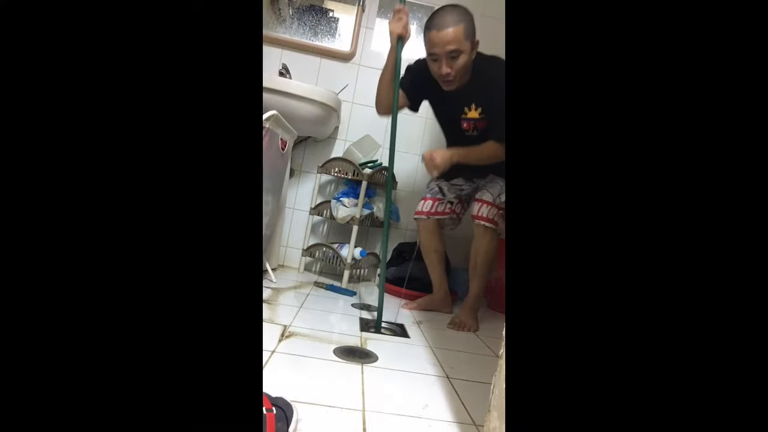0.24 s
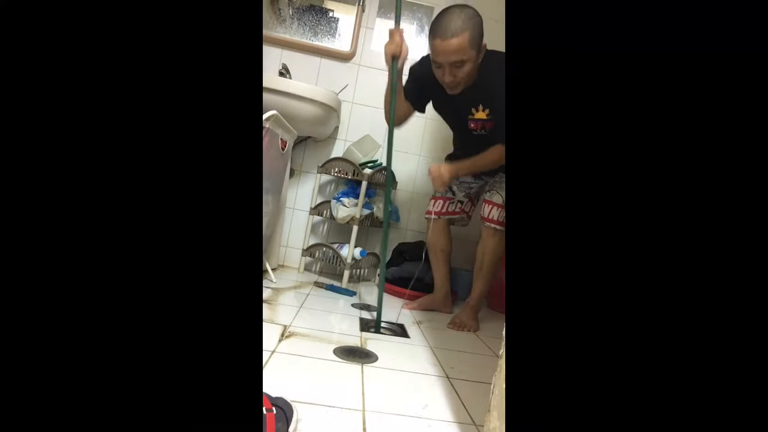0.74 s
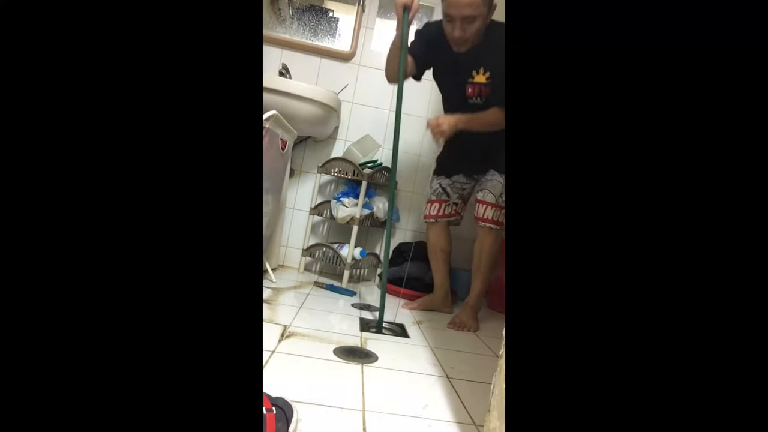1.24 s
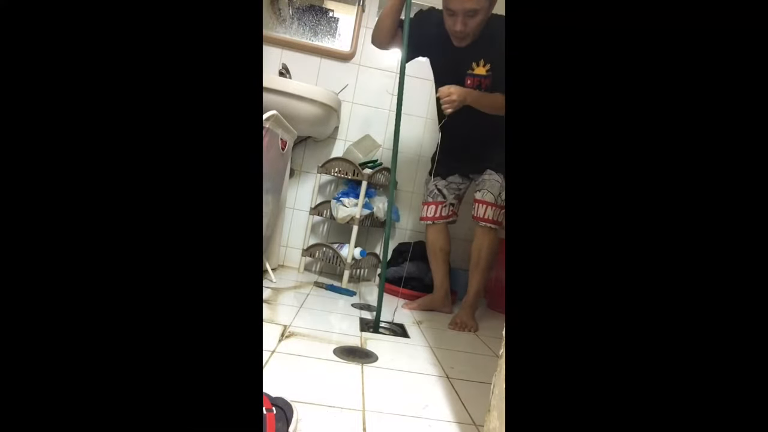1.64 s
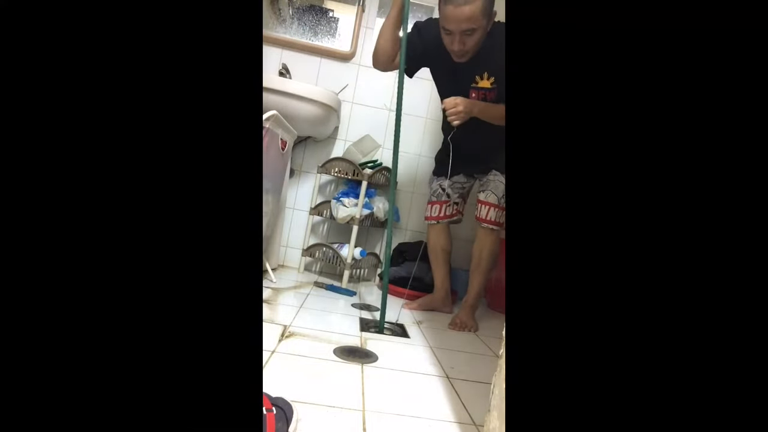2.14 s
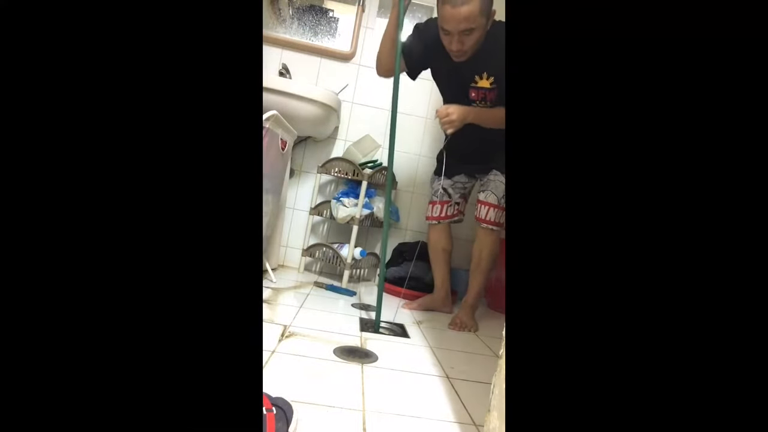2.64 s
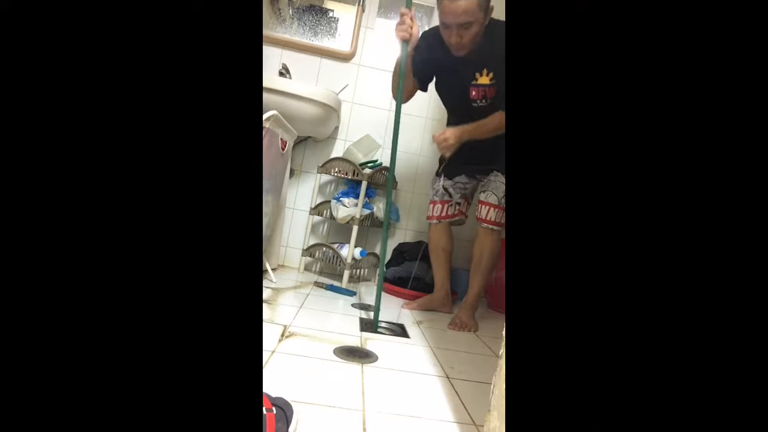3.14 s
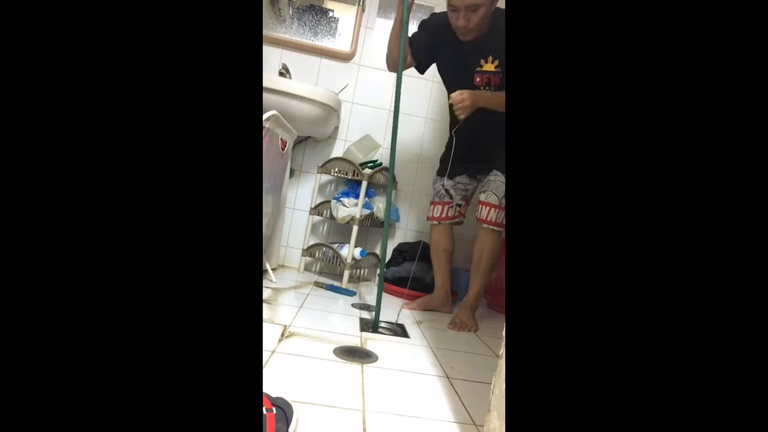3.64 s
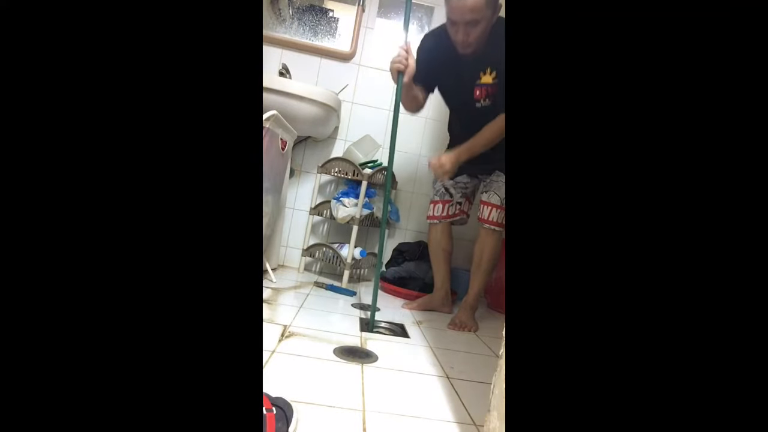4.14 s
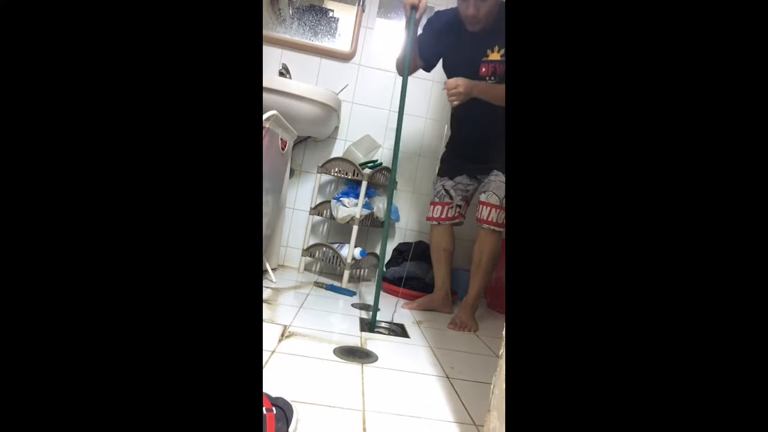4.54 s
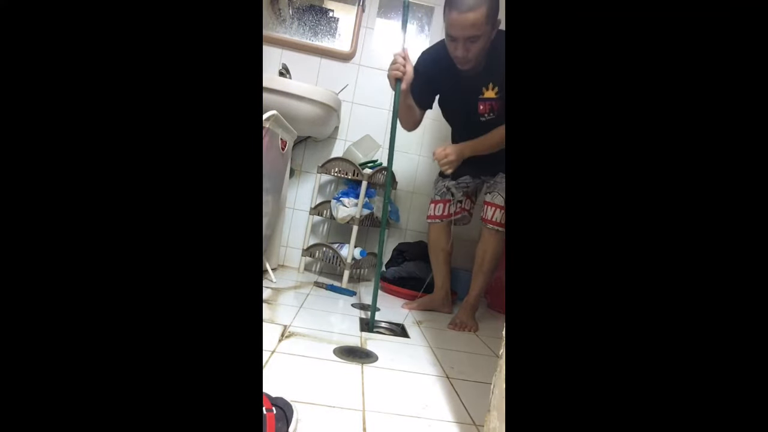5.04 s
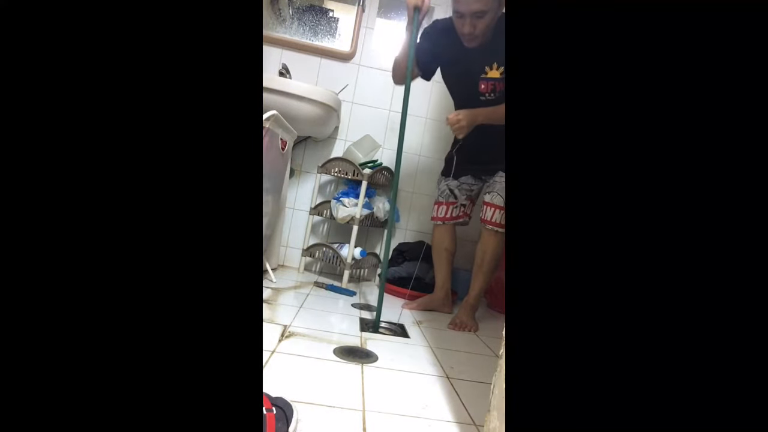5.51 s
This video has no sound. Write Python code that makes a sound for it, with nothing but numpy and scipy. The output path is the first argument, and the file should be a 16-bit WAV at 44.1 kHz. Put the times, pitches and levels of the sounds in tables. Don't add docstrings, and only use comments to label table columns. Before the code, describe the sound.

A long plastic tube is pumped in a clogged floor drain. Rough, rasping surges of water come with hollow knocks, low booms, glugs and spray. Two bursts of strokes are split by a near-silent gap with one lone wet knock, then strokes continue, the hardest rattling around four seconds. Small, hard tiled bathroom with short bright echoes; small microphone nearby, faint hiss and hum.

```python
import sys
import numpy as np
from scipy import signal
from scipy.fft import rfft, irfft
from scipy.io import wavfile
from scipy.ndimage import uniform_filter1d

SR = 44100
rng = np.random.default_rng(int(sys.argv[2]) if len(sys.argv) > 2 else 0)


def ratio_of_db(decibels):
    return 10 ** (np.asarray(decibels, float) / 20)


def wrap_up_sound(samples):
    columns = np.atleast_2d(samples).T
    tamed = np.clip(columns, -1, 1)
    steps = np.round(tamed * 32767).astype(np.int16)
    wavfile.write(sys.argv[1], SR, steps)


N = 254631

# frequency in Hz, width in Hz, level in dB.
SURGE_MODES = [(694, 152, -1), (813, 28, 0), (974, 38, 3), (1176, 32, 4), (1340, 143, 7.5), (1520, 39, -5)]
# frequency in Hz, width in Hz, level in dB.
RASP_MODES = [(1467, 54, -0.5), (1824, 91, -6.5), (1972, 130, -16.5), (2143, 170, -10.5)]
# frequency in Hz, width in Hz, level in dB.
SCRAPE_MODES = [(2246, 153, 4.5), (2783, 96, 7), (3270, 330, -4), (3820, 170, -6)]
# frequency in Hz, density in dB per Hz.
SPRAY = [(2120, -37), (3600, -4.5), (4050, -4), (4450, -5), (4830, -9.5), (6230, -6.5), (8100, -15.5),
         (9770, -17.5), (10600, -21.5), (13900, -21.5), (16000, -31)]
# start in seconds, rise in seconds, hold in seconds, level in dB, brightness in dB.
GUSHES = [(0.11, 0.31, .005, -37, 5.5), (0.222, 0.0069, 0.0041, -23.5, -19.5),
          (0.267, 0.063, 0.086, -30.5, -10), (0.551, 0.14, 0.13, -35, 2.5), (1.034, 0.061, 0.02, -36, 3.5),
          (1.129, 0.05, 0.16, -27.5, -1), (1.242, 0.031, 0.011, -25.5, 2),
          (2.373, 0.099, 0.0052, -46.5, -6), (2.525, 0.04, .02, -50, -3),
          (2.598, 0.0045, 0.045, -34.5, -29), (2.611, 0.048, 0.0037, -30, 3.5),
          (2.782, 0.16, .09, -37.5, -0.5), (2.976, 0.028, 0.11, -24.5, -11), (3.073, 0.04, 0.12, -37.5, 0),
          (3.38, 0.085, .005, -38.5, 4.5), (3.78, 0.038, 0.073, -30.5, 1.5),
          (3.883, 0.13, 0.057, -25.5, 12), (4.339, 0.005, 0.091, -34, -0.5),
          (4.398, 0.023, 0.037, -25, -2.5), (4.458, 0.041, 0.035, -29.5, 2.5),
          (4.797, 0.005, 0.033, -30, -11), (4.803, 0.095, 0.055, -24, 4), (5.225, 0.11, 0.047, -39.5, -2),
          (5.352, 0.089, 0.16, -55.5, 2)]
# start in seconds, rise in seconds, hold in seconds, scrape in dB, spray in dB.
SPLASHES = [(0.578, 0.092, 0.044, -48, -45), (2.64, 0.023, 0.014, -48, -44.5),
            (2.803, 0.0064, 0.02, -61, -56.5), (2.968, 0.026, 0.055, -30, -39),
            (3.304, 0.02, 0.018, -49.5, -57), (3.655, 0.02, 0.033, -58.5, -60),
            (4.272, 0.025, 0.016, -45, -53), (4.706, 0.034, 0.022, -53, -57),
            (4.892, 0.069, 0.031, -31.5, -37), (5.227, .04, 0.031, -52, -55.5),
            (5.306, .004, 0.013, -47, -61)]


def surge():
    drive = slips(per_s=260, spread_db=5.0, hiss=0.49)

    walls = lumpy(drive, SURGE_MODES, lump_db=1.5) + 0.024 * drive
    body = rms_one(band(walls, 503, 1115)) + ratio_of_db(-4) * bubbles()
    body = band(band(body, 360, 4500), 360, 5000)

    rasp = band(lumpy(drive, RASP_MODES, lump_db=1.5), 1724, 2254)
    rasp = rms_one(band(rasp, 710, 4000))

    other_grains = np.roll(drive, SR)
    scrape = band(lumpy(other_grains, SCRAPE_MODES, lump_db=4.0), 2290, 6900)
    scrape = rms_one(band(scrape, 1600, 7500))

    splutter = uniform_filter1d(np.abs(drive), size=260) ** 0.85
    spray = coloured(0.07 * drive + 1.8 * splutter * rng.standard_normal(N), SPRAY)

    levels_db = []
    for *_, db, bright_db in GUSHES:
        upper_db = db - 4.5
        levels_db.append([db - 6.5,
                          upper_db - 4 + 0.93 * bright_db,
                          upper_db - 6 + 0.69 * bright_db,
                          upper_db - 10 + 0.47 * bright_db])
    for *_, scrape_db, spray_db in SPLASHES:
        levels_db.append([-120, -120, scrape_db, spray_db])
    gains = summed([gush(*row[:3]) for row in GUSHES + SPLASHES], levels_db)
    layers = body, rasp, scrape, spray
    return sum(gain * ratio_of_db(2.0 * drift(27)) * layer for gain, layer in zip(gains, layers))


def gush(s, rise_s, hold_s):
    swell_db, drain_db_per_s = 19, 237
    trickle_db, trickle_fall_db_per_s = -25.5, 22.5
    rise = swell_db / max(rise_s, .002)
    opened = swell(s, 10, 2 * rise, 0)
    main = swell(s + rise_s, hold_s, rise, drain_db_per_s)
    trickle = swell(s + rise_s, hold_s, rise, trickle_fall_db_per_s)
    return opened * (main + ratio_of_db(2 * trickle_db) * trickle)


def slips(per_s, spread_db, hiss):
    sizes = ratio_of_db(spread_db * np.minimum(rng.exponential(1, N), 2.6)) * rng.choice([-1, 1], N)
    born = rng.random(N) < per_s * ratio_of_db(5 * drift(40)) / SR
    return rms_one(sizes * born) + hiss * rng.standard_normal(N)


def lumpy(x, modes, lump_db):
    return sum((-1) ** k * ratio_of_db(lump_db * drift(27)) * resonate(x, [mode]) for k, mode in enumerate(modes))


def bubbles():
    pitches = np.geomspace(880, 2900, 24)
    born = slips(per_s=320, spread_db=5.0, hiss=0)
    dealt = rng.integers(0, 24, N)
    out = 0
    for k, hz in enumerate(pitches):
        mode = (hz, 1.96 * hz / 25.5, -4.0 * np.log2(hz / 1000))
        out = out + resonate(born * (dealt == k), [mode])
    return rms_one(out)


# frequency in Hz, phase waver in radians, flutter in dB.
COLUMN_MODES = [(63.2, 0.42, -0.5), (120.4, 0.63, 1.5), (231.4, 1, 2.5), (293.4, 1, 3)]
# frequency in Hz, width in Hz, level in dB.
GURGLE_MODES = [(271.5, 8.8, -2.5), (382.5, 30, 2.5), (400, 46, -0.5), (469, 92, -4.5)]
# peak in seconds, deepest mode in dB, second mode in dB.
HEAVES = [(.22, -49, -40.5), (.4, -45, -46), (.54, -53, -48), (.8, -44, -35), (1.25, -34.5, -49),
          (1.32, -44, -37), (1.44, -33.5, -35.5), (1.75, -53, -50), (2.2, -50, -67), (2.46, -59, -41),
          (2.55, -64, -37), (2.84, -45, -45), (3.07, -37, -40), (3.33, -45, -50), (3.5, -67, -57),
          (3.61, -49, -63), (3.89, -39, -49), (4.05, -39.5, -41.5), (4.45, -50, -42), (4.51, -28.5, -56),
          (4.58, -46, -50), (4.84, -49, -44), (4.98, -31, -47), (5.03, -52, -35), (5.17, -39, -53),
          (5.38, -47.5, -51)]
# peak in seconds, third mode in dB, fourth mode in dB, gurgle in dB.
PUSHES = [(.234, -36, -36.5, -60), (.32, -42, -31.5, -41), (0.382, -34.5, -31, -32.5),
          (0.45, -41, -37, -38.5), (0.658, -38, -30.5, -61), (.722, -37, -52, -33), (.794, -44, -35, -55),
          (1.11, -40, -36, -56), (1.17, -40, -25, -47), (1.205, -25, -24, -23), (1.256, -24, -20.5, -28),
          (1.29, -36, -27.5, -26.5), (1.328, -27.5, -36, -21.5), (1.61, -46.5, -53, -40.5),
          (2.51, -41.5, -41, -40), (2.57, -41, -61, -60), (2.64, -57, -38, -32), (2.73, -45, -43, -43),
          (3.01, -28, -25.5, -28), (3.08, -28, -45, -28.5), (3.169, -32, -26.5, -33.5),
          (3.487, -39, -52, -34), (3.6, -47, -72, -79), (3.821, -44, -34, -39), (3.93, -40, -29, -30.5),
          (4.041, -21, -17, -28), (4.1, -35, -24.5, -40), (4.36, -40, -55, -35), (4.438, -27, -23, -33),
          (4.472, -43, -40, -35), (4.54, -33.5, -38, -32.5), (4.82, -39, -45, -33.5),
          (4.91, -35, -19.5, -33), (4.99, -25.5, -40, -27)]


def column():
    t = np.arange(N) / SR
    rings = []
    for hz, waver, flutter_db in COLUMN_MODES:
        tone = np.sin(2 * np.pi * hz * t + waver * drift(9.5))
        rings.append(rms_one(tone * ratio_of_db(flutter_db * drift(21.7))))
    rough = slips(per_s=100, spread_db=2.0, hiss=0.27)
    gurgle = rms_one(band(resonate(rough, GURGLE_MODES), 195, 411))

    heaves = [swell(row[0], 0.0042, 164, 100) for row in HEAVES]
    pushes = [swell(row[0], 0.0032, 240, 146) for row in PUSHES]
    deep_gains = summed(heaves, np.array(HEAVES)[:, 1:], [-53.5, -65])
    upper_gains = summed(pushes, np.array(PUSHES)[:, 1:], [-62.5, -68.5, -74])
    return sum(gain * ring for gain, ring in zip(deep_gains + upper_gains, rings + [gurgle]))


# time in seconds, crack in dB, crack frequency in Hz, thud in dB.
KNOCKS = [(0.031, -22, 2460, -52), (0.2355, 0, 1420, -25), (0.2283, -7, 1570, -42), (0.24, -7, 1125, -36),
          (0.279, -13, 1340, -40), (0.653, -19, 2200, -50), (0.841, -1.5, 1350, -26),
          (0.695, -15, 2050, -29), (0.767, -0.5, 1860, -17), (0.771, -20, 2740, -29),
          (1.047, -22, 1680, -57), (1.096, -12, 1440, -23.5), (1.163, -6, 1380, -37),
          (1.202, -1, 1360, -38), (1.243, 0.5, 1020, -28), (1.273, -2.5, 970, -30), (1.31, -14, 1880, -30),
          (1.334, -11, 1030, -31), (1.375, -4.5, 1010, -22), (1.7478, -6.5, 990, -19),
          (2.342, -30, 1810, -41.5), (2.46, -31, 1390, -47), (2.551, -20, 1180, -41),
          (2.604, -17, 1100, -24), (2.672, -6.5, 1970, -27), (2.668, -1, 954, -42), (2.812, -21, 2180, -35),
          (2.913, -21, 950, -38), (2.979, -2, 2270, -26), (2.983, -7, 1100, -22), (2.998, -6, 1010, -22),
          (3.024, 4, 915, -32), (3.031, -10, 1300, -23), (3.008, -7.5, 1900, -26), (3.062, -8, 1070, -35),
          (3.084, -13, 1520, -26), (3.102, -3, 1570, -23)]
# time in seconds, crack in dB, crack frequency in Hz, thud in dB.
LATE_KNOCKS = [(3.48, -13.5, 2340, -22), (3.792, -20, 1050, -30), (3.826, -12, 1030, -23.5),
               (3.958, 1.5, 2100, -17.5), (4.347, -11, 750, -42), (4.355, -7, 1230, -27),
               (4.426, -1, 950, -13.5), (4.444, -5, 1410, -32), (4.803, -17, 720, -37),
               (4.805, -12, 1050, -18), (4.858, -10, 1910, -26), (4.9244, 0.5, 2150, -13),
               (4.93, -7, 1030, -23), (4.955, -8, 1110, -21), (4.975, 2.5, 1500, -20.5),
               (5.317, -2.5, 1420, -11.5)]
# time in seconds, crack in dB.
RATTLE = [
    (4.002, 1.5),
    (4.012, -8),
    (4.025, 3.5),
    (4.047, 6),
    (4.058, -2),
    (4.064, -7),
    (4.072, -3),
    (4.098, -12),
]
# frequency in Hz, width in Hz, level in dB.
UPPER_MODES = [(233, 25, 3), (307, 26.5, 5), (370.5, 27, 2.5), (460, 65, -11), (694, 99, -7.5)]


def knocks():
    t = np.arange(1024) / SR
    rattle = [(s, db, 1690, db - 23) for s, db in RATTLE]
    hits = KNOCKS + LATE_KNOCKS + rattle
    chatter = rng.standard_normal((len(hits), len(t))) * np.exp(-t / 0.001)
    chatter[:, 0] = 6
    chatter /= np.linalg.norm(chatter, axis=1)[:, None]
    out, thud = np.zeros((2, N + len(t)))
    for (s, db, hz, thud_db), touch in zip(hits, chatter):
        crack = resonate(touch, [(hz, 0.11 * hz, 7)]) + 0.5 * band(touch, 0.37 * hz, 3.7 * hz)
        crack = band(band(crack, 420, 2.2 * hz), 220, 1.83 * hz)
        at = round(s * SR)
        out[at:at + len(t)] += ratio_of_db(db + 11.0) * crack
        thud[at] = ratio_of_db(thud_db + 23.0)
    boom = band(thud + 4.24 * resonate(thud, UPPER_MODES), 115, 820)
    return (out + boom)[:N]


# time in seconds, level in dB, centre in Hz, width in Hz, decay in milliseconds.
SPURTS = [(0.0308, -27, 5200, 3500, 12), (0.028, -47, 10600, 9200, 19), (.97, -56, 9000, 11000, 25),
          (1.7478, -26, 4390, 720, 7.7), (1.7478, -32.5, 5000, 6800, 16), (1.748, -25, 1040, 1800, 14.7),
          (5.3165, -34.5, 830, 750, 16), (0.2275, -15.5, 1600, 810, 2.2), (2.7, -49, 3700, 950, 4.5),
          (2.5502, -38, 3300, 850, 4.5), (2.8118, -37, 5200, 4700, 5.6), (2.8123, -50, 12900, 5100, 8.5),
          (2.918, -47, 8600, 11000, 6.0), (3.7, -45, 5000, 2500, 4.0), (5.436, -35, 2750, 500, 6.0),
          (4.303, -39, 2800, 360, 15), (4.303, -54, 6200, 900, 11), (3.951, -35.5, 6100, 2500, 14),
          (4.176, -50.5, 12200, 6900, 30), (4.215, -57, 8000, 670, 21), (5.287, -49, 2450, 2300, 27),
          (5.316, -14, 2780, 3000, 3.5), (5.3147, -42.5, 9300, 8000, 4.7), (5.3158, -22.5, 5800, 3600, 2.3),
          (2.9785, -27, 3500, 3100, 5.8), (2.995, -30.5, 4140, 920, 46), (1.7476, -50, 12000, 5500, 10),
          (0.2362, -13, 1700, 2500, 0.88), (0.767, -24, 2970, 580, 4.4), (1.2025, -21, 1300, 700, 5),
          (3.958, -16.5, 1900, 1500, 6.2), (5.512, -52, 6900, 580, 6.4)]


def spurts():
    out, t = np.zeros(N), np.arange(SR // 5) / SR
    hisses = rng.standard_normal((len(SPURTS), len(t)))
    for (s, db, hz, width_hz, ms), hiss in zip(SPURTS, hisses):
        edges = hz - width_hz / 2, hz + width_hz / 2
        jet = rms_one(band(band(hiss, *edges), *edges)) * np.exp(-t * 1000 / ms)
        out[round(s * SR):][:len(t)] += ratio_of_db(db) * jet
    return out


# time in seconds, level in dB, frequency in Hz.
TICKS = [(0.0316, -23, 2360), (0.2307, -28, 2730), (0.2362, -21, 2900), (0.241, -14, 2320),
         (0.6443, -38, 2810), (0.7142, -27, 2840), (1.0674, -45, 2860), (1.0838, -34, 2710),
         (1.1806, -24, 2650), (1.2819, -27, 2940), (1.7472, -24, 4250), (1.7484, -20, 1240),
         (1.749, -22.5, 2860), (1.7493, -22, 5300), (1.761, -24, 1200), (1.786, -31, 3350),
         (2.4592, -38.5, 3540), (2.459, -50, 2500), (2.55, -36, 3800), (2.5515, -41, 1990),
         (2.6043, -35, 1900), (2.627, -32, 2580), (2.642, -25, 2500), (2.6498, -23, 2500),
         (2.659, -21.5, 4530), (2.6699, -18, 2480), (2.726, -27, 2400), (2.8107, -27, 4050),
         (2.812, -35, 5400), (2.816, -29, 6300), (2.979, -15.5, 2780), (2.996, -26, 4300),
         (3.0324, -16, 2920), (3.035, -24, 4400), (3.05, -27, 4200), (3.084, -17, 3000),
         (3.2265, -26, 2570), (3.4775, -25.5, 2740), (3.7937, -33, 4370), (3.8101, -28, 3810),
         (3.8635, -22, 2810), (3.9593, -14, 2000), (3.9626, -15, 3700), (4.0025, -7.5, 1900),
         (4.0255, -11.5, 1850), (4.0485, -12, 2100), (4.312, -33, 2790), (4.3475, -32, 1500),
         (4.3649, -29, 3470), (4.4661, -24.5, 2590), (4.7829, -34, 4040), (4.8064, -29, 2590),
         (4.8587, -26, 3640), (4.87, -13, 3270), (4.906, -12, 2900), (4.953, -13, 2810), (4.976, -24, 2830),
         (5.2898, -38, 3220), (5.3174, -9, 2750), (5.3187, -15, 1430)]
# time in seconds, level in dB, frequency in Hz.
GLUGS = [(0.235, -15.5, 1070), (0.278, -26, 1310), (0.326, -19, 785), (0.679, -26, 942), (0.731, -22, 980),
         (0.77, -18.5, 694), (1.163, -23, 1310), (1.201, -13, 1170), (1.241, -13, 980), (1.274, -17, 964),
         (1.334, -18, 1020), (1.376, -20, 988), (1.743, -31, 1100), (1.747, -17.5, 1200), (2.604, -23, 993),
         (2.646, -23, 931), (2.67, -22, 1020), (2.979, -19, 1030), (2.997, -21, 1030), (3.023, -10, 939),
         (3.069, -18, 915), (3.107, -20, 1000), (3.794, -31, 603), (3.816, -28, 1050), (3.826, -18, 1020),
         (4.001, -19, 810), (4.023, -13, 1260), (4.347, -26, 660), (4.425, -20.5, 969), (4.469, -21, 1000),
         (4.537, -24, 974), (4.795, -26, 665), (4.804, -28, 1050), (4.856, -25, 1070), (4.923, -14, 935),
         (5.317, -12, 1310)]


def drops():
    return fading_cycles(TICKS, cycles=11) + ratio_of_db(-6) * fading_cycles(GLUGS, cycles=14)


def fading_cycles(rows, cycles):
    out, t = np.zeros(N), np.arange(1024) / SR
    for s, db, hz in rows:
        onset = 1 - np.exp(-1.5 * hz * t)
        decay = ratio_of_db(-26.0 * hz * t / cycles)
        out[round(s * SR):][:len(t)] += ratio_of_db(db) * np.sin(2 * np.pi * hz * t) * onset * decay
    return out


# peak in seconds, hold in seconds, level in dB.
SLOSHES = [
    (.33, 0.069, -40),
    (0.768, .03, -41),
    (1.188, 0.11, -38.5),
    (2.66, .03, -63),
    (3.024, 0.13, -44),
    (3.994, 0.07, -46.5),
    (4.439, .05, -38),
    (4.928, 0.094, -34),
    (5.327, .02, -48),
]


def slosh():
    shapes = [swell(s, hold_s, 164, 100) for s, hold_s, _ in SLOSHES]
    gain, = summed(shapes, np.array(SLOSHES)[:, 2:])
    rough = slips(per_s=200, spread_db=7.0, hiss=0.46)
    return gain * rms_one(band(band(rough, 104, 169), 136, 315))


# frequency in Hz, reverberation time in seconds.
TILE_T60 = [(100, 0.11), (300, 0.45), (800, 0.43), (2000, 0.38), (5000, 0.38), (13000, 0.35)]
# delay in milliseconds, level in dB.
ECHOES = [
    (1.9, 4),
    (3.5, -9.5),
    (8.5, -1.5),
    (12.5, -2),
    (17, -4),
]


def bathroom(x):
    size = SR // 2
    t = np.arange(size) / SR
    lows = 90 * 2 ** np.arange(0, 8.)
    highs = np.append(lows[1:-1], 19000)
    tail = 0
    for low, high in zip(lows, highs):
        decay = ratio_of_db(-60 * t / at_hz(TILE_T60, 1.4 * low))
        tail = tail + band(rng.standard_normal(size), low, high) * decay
    tail *= 1 - np.exp(-t / 0.0035)
    response = ratio_of_db(-0.5) * tail / np.sqrt(np.sum(tail ** 2))
    echoes = np.zeros(size)
    for ms, db in ECHOES:
        echoes[round(ms * SR / 1000)] = ratio_of_db(db - 5)
    response += band(echoes, 49, 3480)
    response[0] = 1
    return signal.fftconvolve(x, response)[:N]


# frequency in Hz, density in dB per Hz.
FLOOR = [(110, -20), (190, -32), (246, 6), (750, -8.5), (1130, -6.5), (1360, -10), (3760, -14.5),
         (4970, -18.5), (5990, -16), (6570, -21.5), (16000, -31.5)]


def background_hiss():
    return ratio_of_db(-49.5 - 3.5) * coloured(rng.standard_normal(N), FLOOR) * ratio_of_db(1.6 * drift(0.33))


def rumble():
    return ratio_of_db(-53 + 1.5) * rms_one(band(band(rng.standard_normal(N), 36, 138), 43, 480))


def swell(peak_s, hold_s, rise_db_per_s, fall_db_per_s):
    t = np.arange(0, N + 64, 64) / SR - peak_s
    rise_db = rise_db_per_s * np.minimum(t, 0)
    fall_db = fall_db_per_s * np.maximum(t - hold_s, 0)
    return ratio_of_db(2 * (rise_db - fall_db))


def summed(shapes, dbs, rest_db=-120):
    power = ratio_of_db(2 * np.transpose(dbs)) @ shapes + ratio_of_db(2 * np.reshape(rest_db, (-1, 1)))
    return [np.interp(np.arange(N) / 64, np.arange(len(p)), np.sqrt(p)) for p in power]


def resonate(x, modes):
    out = 0
    for k, (hz, width, db) in enumerate(modes):
        r = np.exp(-np.pi * width / SR)
        b = (1 - r * r) / 2 * np.array([1, 0, -1]) * ratio_of_db(db) * (-1) ** k
        out = out + signal.lfilter(b, [1, -2 * r * np.cos(2 * np.pi * hz / SR), r * r], x + 1e-18)
    return out


def band(x, low_hz, high_hz):
    return signal.sosfilt(signal.butter(2, [low_hz, high_hz], "band", fs=SR, output="sos"), x)


def coloured(x, points):
    hz = np.fft.rfftfreq(N, 1 / SR)
    skirt = np.minimum(hz / points[0][0], 1) ** 4
    return rms_one(irfft(rfft(x) * ratio_of_db(at_hz(points, hz)) * skirt, N))


def at_hz(points, hz):
    points = np.array(points)
    return np.interp(np.log(hz + 1), np.log(points[:, 0]), points[:, 1])


def drift(rate):
    r = np.exp(-2 * np.pi * rate / SR)
    return rms_one(signal.lfilter([1], [1, -2 * r, r * r], rng.standard_normal(N + SR))[SR:])


def rms_one(x):
    return x / np.sqrt(np.mean(x ** 2) + 1e-20)


def scene():
    hiss = background_hiss()
    hum = rumble()
    wet_drops = drops()
    at_tube = surge() + ratio_of_db(-3.5) * wet_drops + knocks() + spurts()
    mix = bathroom(at_tube) + 0.74 * wet_drops + column() + slosh() + hiss + hum
    return mix[None]


def roll_off(x):
    return signal.sosfilt(signal.butter(12, 15880, fs=SR, output="sos"), x)


def record(dry):
    thin = signal.sosfilt(signal.butter(2, 42, "high", fs=SR, output="sos"), dry)
    thin = thin - 0.28 * resonate(thin, [(4890, 350, 0)])
    finished = 1.164 * np.tanh(thin / 1.238)
    return roll_off(finished)


dry = scene()
out = record(dry)
wrap_up_sound(out)
```